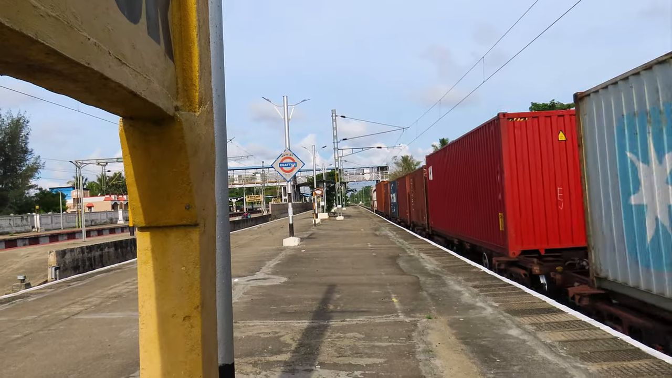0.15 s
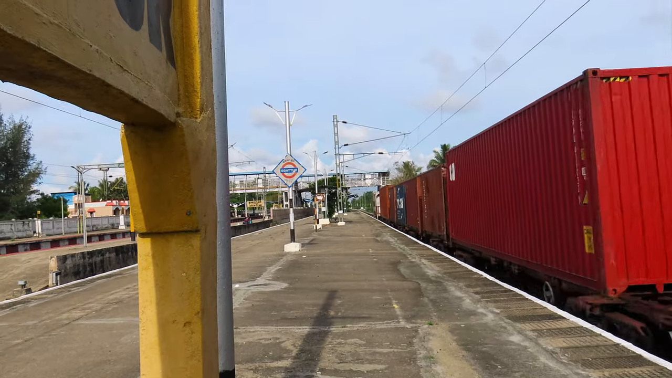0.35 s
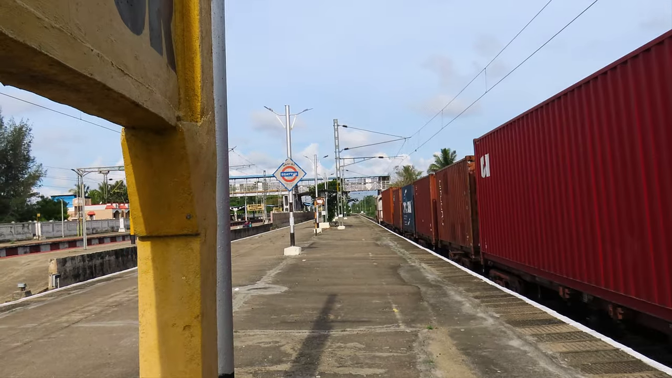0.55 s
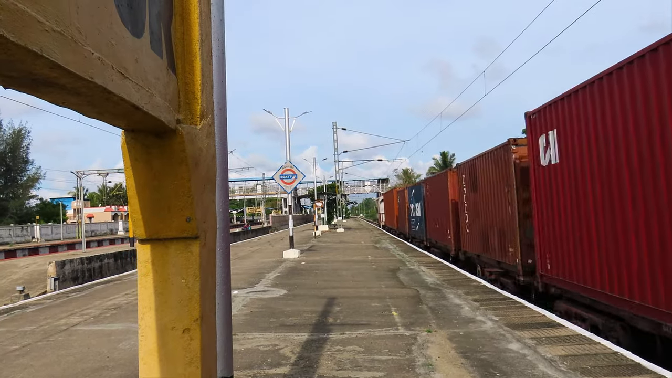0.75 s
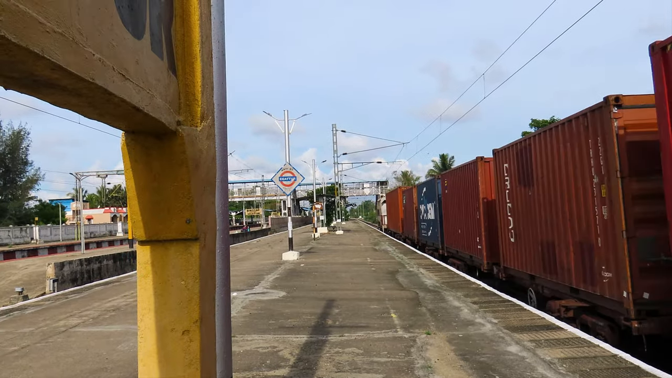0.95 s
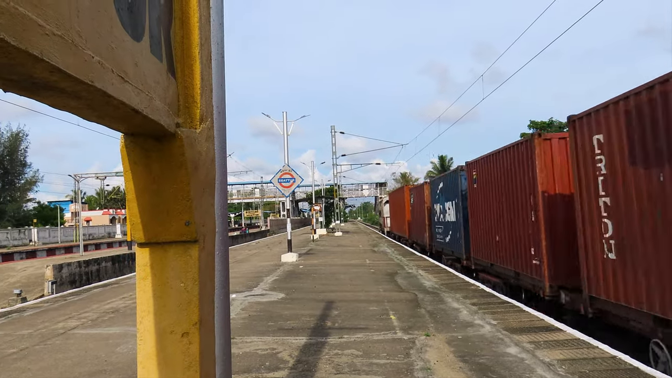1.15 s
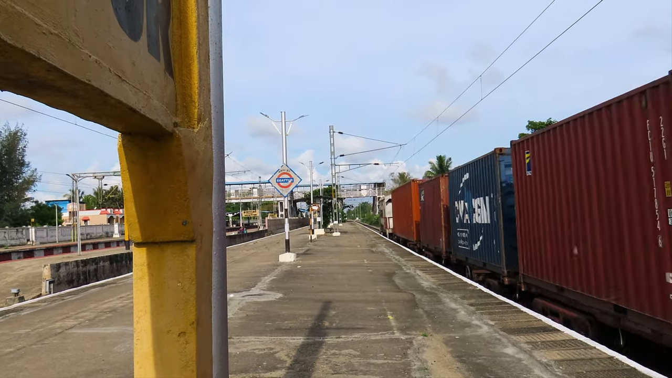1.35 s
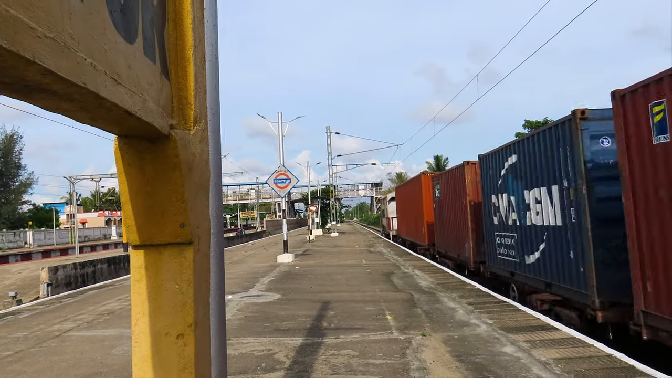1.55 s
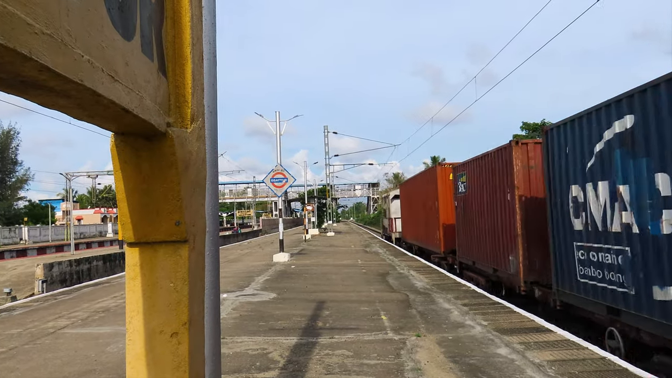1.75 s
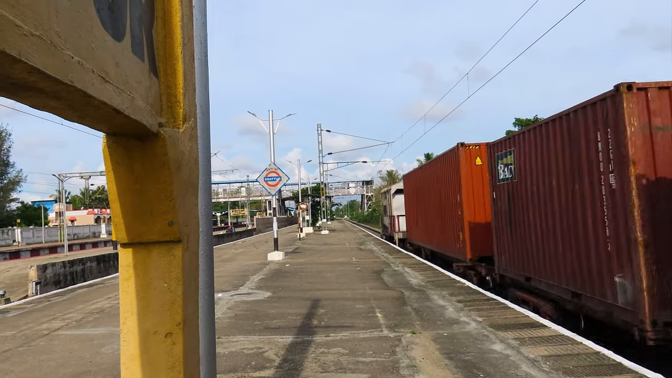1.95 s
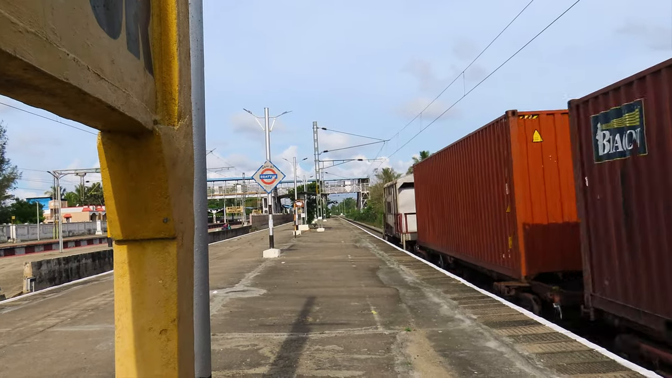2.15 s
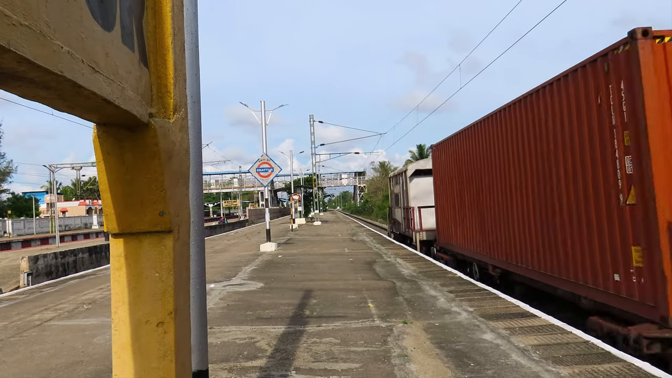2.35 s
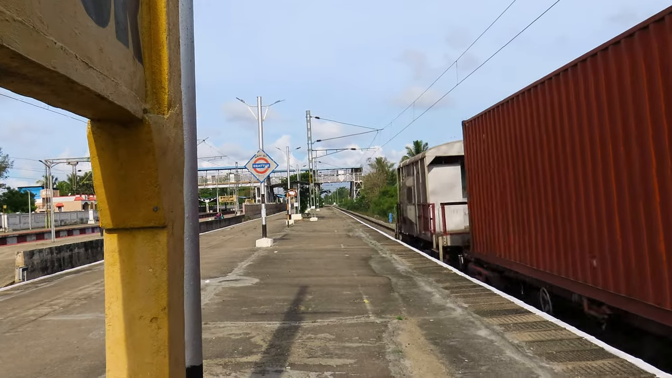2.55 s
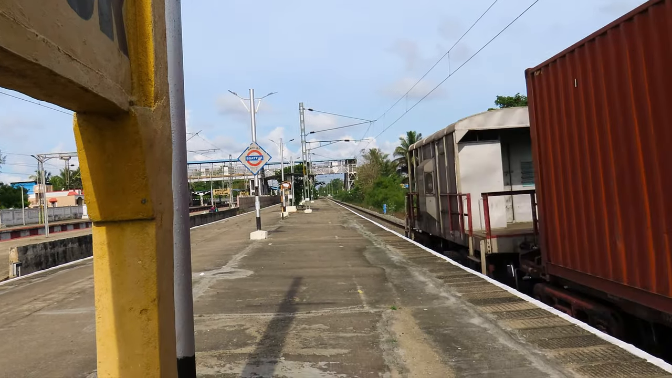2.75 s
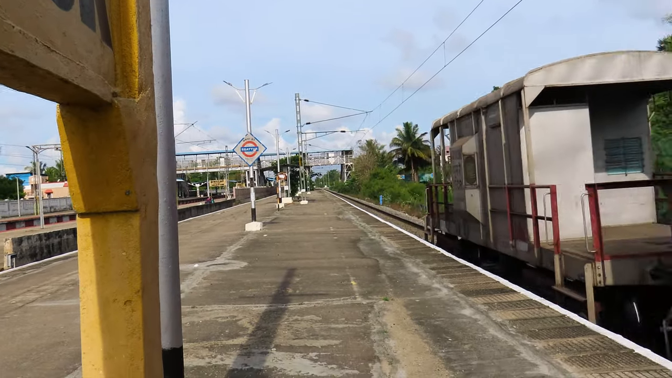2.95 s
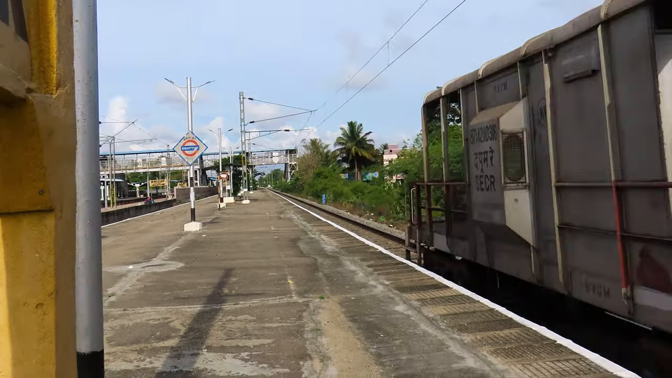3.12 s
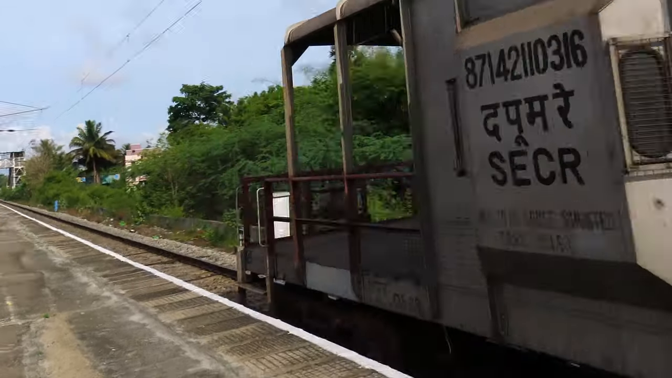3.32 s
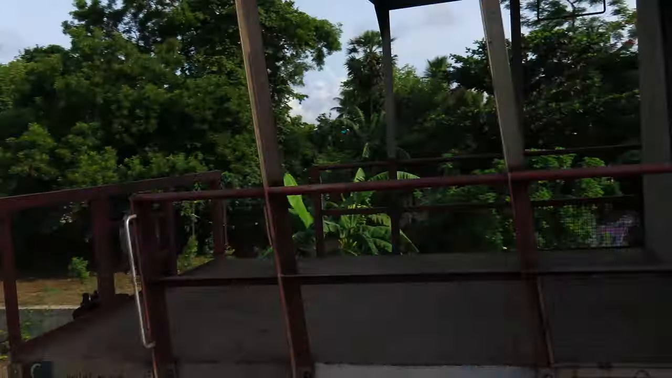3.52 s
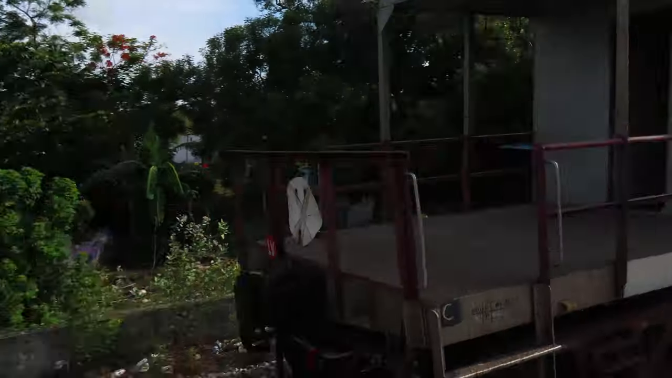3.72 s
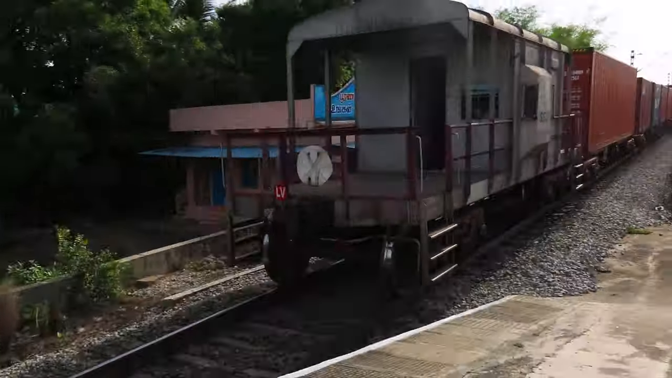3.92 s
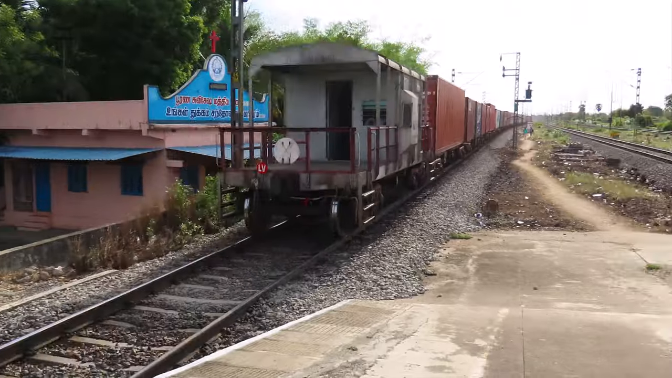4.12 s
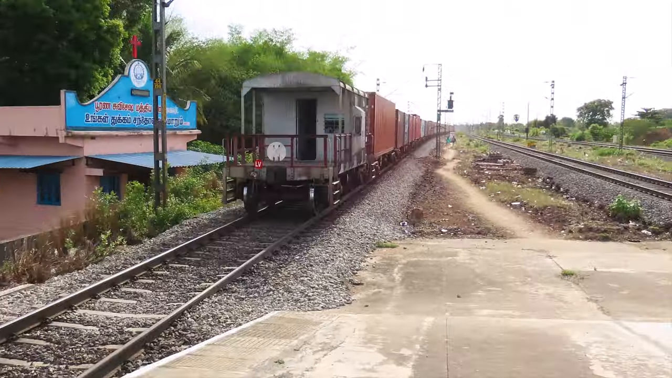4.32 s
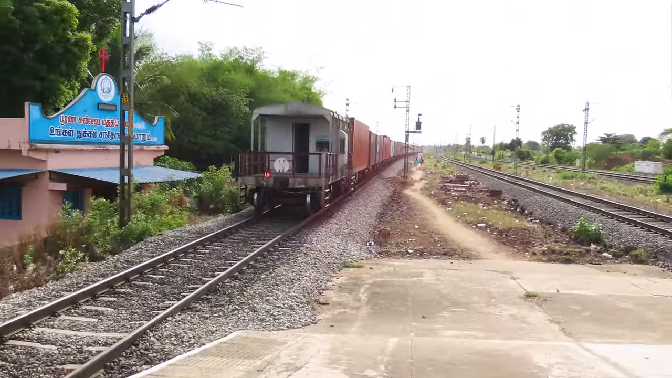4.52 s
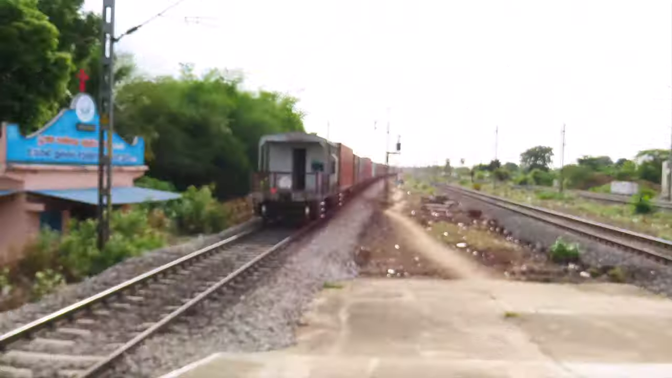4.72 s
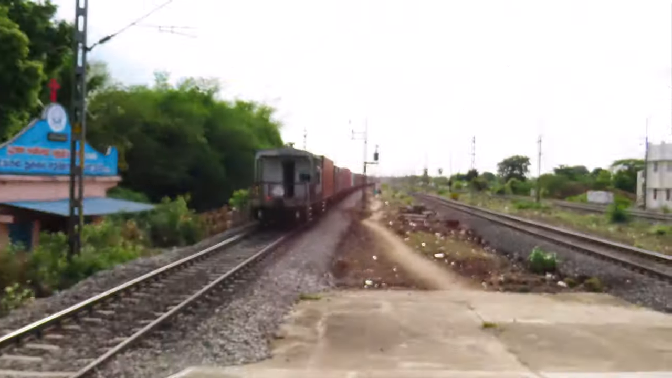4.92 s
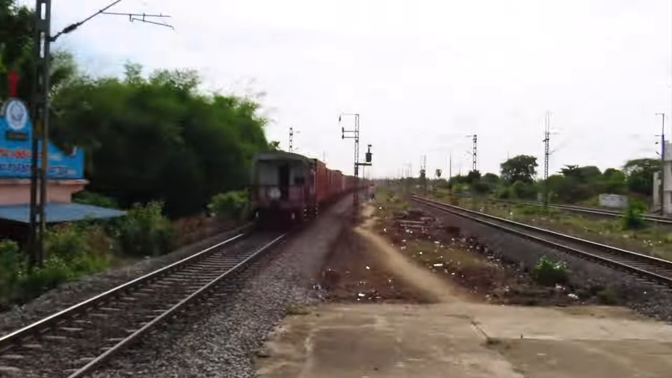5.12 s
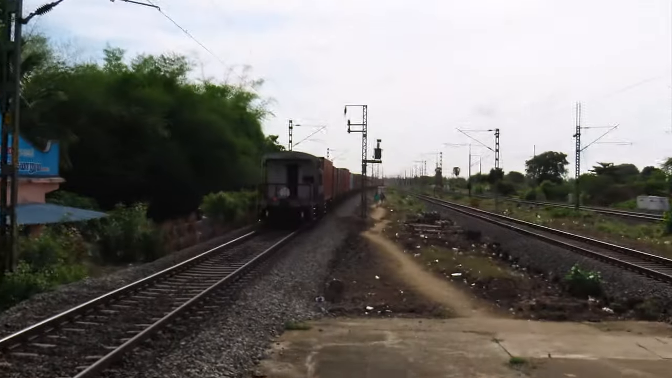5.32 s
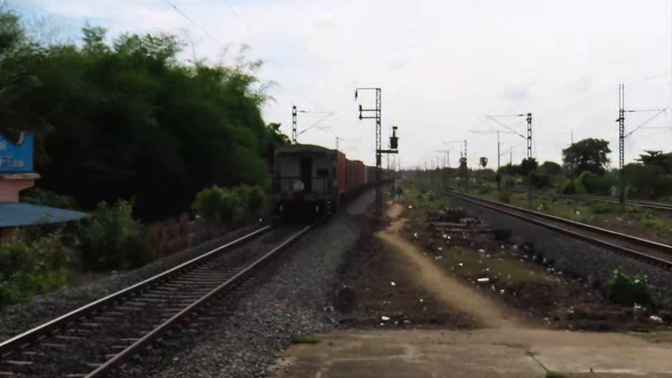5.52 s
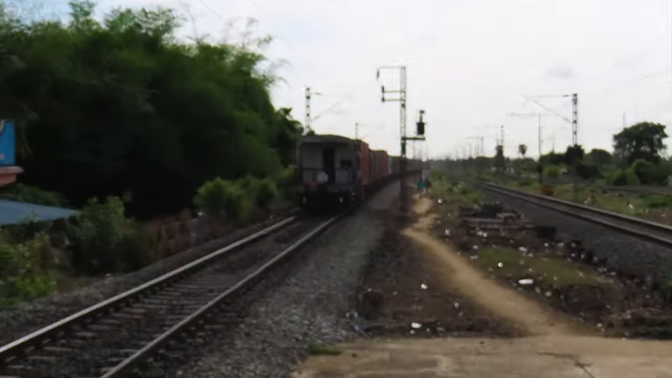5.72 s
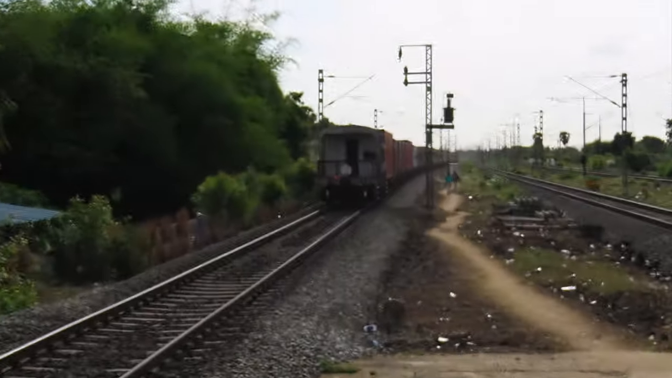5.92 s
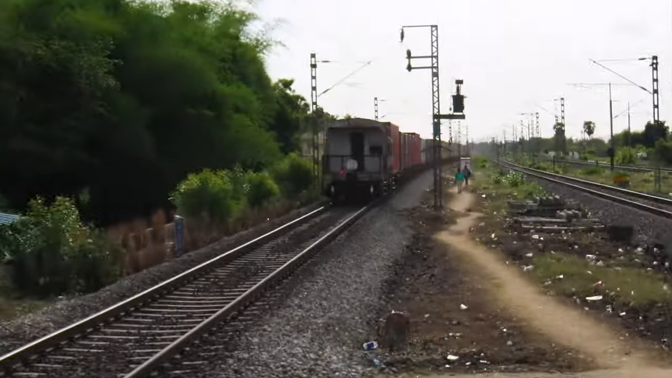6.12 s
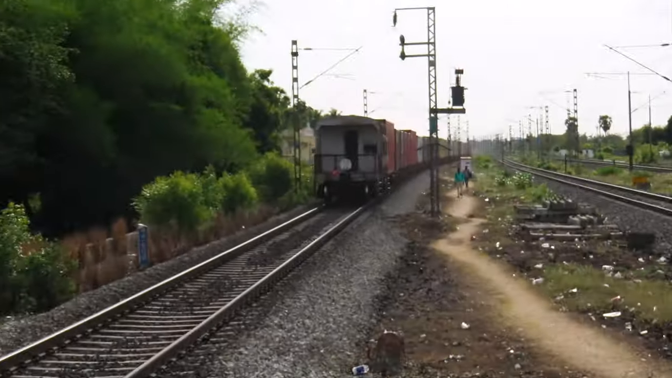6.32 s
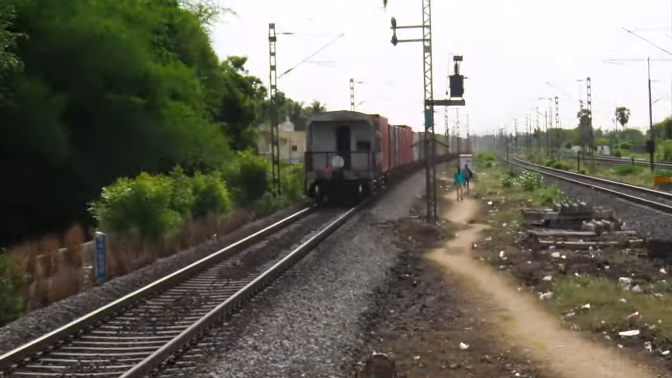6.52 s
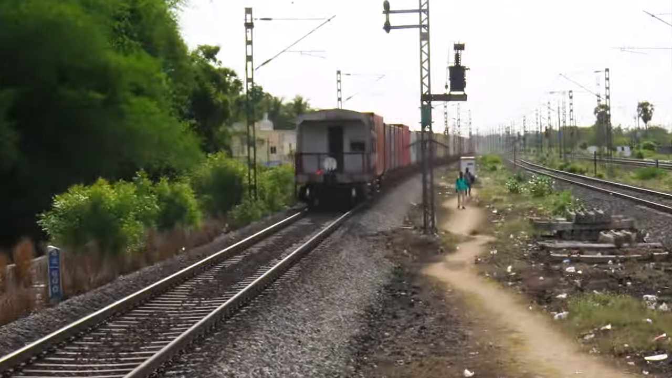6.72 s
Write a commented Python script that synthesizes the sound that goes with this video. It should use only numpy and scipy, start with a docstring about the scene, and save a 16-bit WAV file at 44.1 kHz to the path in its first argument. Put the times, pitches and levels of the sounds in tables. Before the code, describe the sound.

Close beside an open station platform, freight wagon wheels strike a rail joint in quick pairs, grouped in fours, with steely clacks, dull thumps and a roar swelling at each bogie. After three seconds a guard's van clatters past with loose metal knocks and ringing railings. Then the train recedes into a steady, lumpy rumble with soft rail song and thin wavering notes. The stereo microphone stays near the track.

```python
"""A station platform: a container train runs past, its wheels hammering over a rail joint a few metres away.
Every wheel clips the joint, then thumps the sleepers and rattles its bogie; bogies pair up around couplings.
Rolling noise, made of tiny random impacts, swells with each bogie, and a guard's van clatters by.
Then filtered noise makes the rumble and rail song of the departing train, with low swells, thin notes and a ping."""
import sys
import numpy as np
from scipy import signal
from scipy.fft import rfft, irfft, next_fast_len
from scipy.io import wavfile
from scipy.ndimage import uniform_filter1d

SR = 44100
rng = np.random.default_rng(int(sys.argv[2]) if len(sys.argv) > 2 else 0)


def unload_audio(sound):
    """Save the sound as a 16-bit wav file, at the path given as the first command line argument."""
    columns = np.transpose(np.atleast_2d(sound))
    # keep every value between -1 and 1, then stretch to whole-number steps
    steps = np.round(np.clip(columns, -1, 1) * 32767)
    wavfile.write(sys.argv[1], SR, steps.astype(np.int16))


N = 298557
TIME = np.arange(N) / SR
# All levels in dB are relative: a source may shift them when it mixes its parts.

# Every wheel that crosses the joint, two to a bogie.
# Each row: time in seconds, weight of the blow in dB, steely ring in dB, knock pitch in Hz,
# ring pitch in Hz, upper ring pitch in Hz, first touch in dB.
WHEELS = [(0.001, 2, -4.5, 287, 920, 1740, 9.5), (0.073, -1.5, -1.5, 593, 1227, 1880, -4.5),
          (0.218, -4, 4.5, 497, 1140, 1775, -11), (0.306, -0.5, 2.5, 627, 956, 1806, 9),
          (0.679, 3.5, 0.5, 550, 1165, 1744, -0.5), (0.766, -1, 0, 594, 848, 1723, 4.5),
          (0.91, -2, 1, 330, 974, 1754, -3), (0.995, -2.5, 1, 562, 930, 1406, -2),
          (1.331, 1.5, 1.5, 344, 1017, 1450, 8), (1.415, -3.5, 0.5, 617, 1132, 1700, 8.5),
          (1.545, 2.5, 4, 366, 980, 1805, -21), (1.631, 0.5, -1, 605, 882, 1674, -17),
          (1.969, 0, -2.5, 257, 1340, 1577, 4.5), (2.052, -2.5, -1, 533, 1150, 1790, 6),
          (2.180, 1, 4, 342, 1020, 1524, -14), (2.267, -0.5, 1, 600, 940, 1680, -19),
          (2.601, -1.5, -4, 263, 1053, 1530, 1), (2.689, -1, -3.5, 500, 1055, 1610, 2.5),
          (2.83, -3.5, 3, 310, 1000, 1680, -6), (2.917, -2, 2.5, 614, 970, 1840, 5.5),
          (3.290, -3.5, 4, 396, 1112, 1580, 7), (3.379, -1, 0, 676, 904, 1640, 7),
          (3.497, -3, -2.5, 552, 1020, 1760, 1.5), (3.587, -2.5, -1.5, 507, 895, 2070, 6),
          (3.778, -1.5, -7, 264, 827, 1960, -17), (3.873, -8, -7, 420, 950, 1790, -7)]
# The four axles around a coupling, in order.
# Each row: hardness in dB, thud in dB, knock in dB, clang in dB, rattle in dB,
# knock delay in seconds, first touch in dB.
AXLES = [(-1, -21.5, -14.5, -14.5, -41, 0.0063, -7), (-1, -17.5, -10.5, -13.5, -42, 0.0011, -2.5),
         (-0.5, -23, -14, -19, -45.5, 0.0084, -25.5), (1, -19, -9.5, -16.5, -42, 0.0012, -10.5)]
# A wheel touches the joint's first edge just before it drops.
TOUCH_LEAD_S, TOUCH_CLANK_DB, TOUCH_CHINK_DB = 0.02, -8.5, -36


def joint():
    """Wheels cross the gap in a four-beat figure; each has its own weight and pitches."""
    out = np.zeros(N)
    for k, (s, weight_db, ring_db, knock_hz, ring_hz, upper_hz, touch_db) in enumerate(WHEELS):
        hard_db, thud_db, knock_db, clang_db, rattle_db, knock_s, edge_db = AXLES[k % len(AXLES)]
        blow = axle(hard_db, thud_db + weight_db, knock_db + weight_db, clang_db + ring_db,
                    rattle_db + ring_db, knock_s, knock_hz, ring_hz, upper_hz)
        add(out, s, blow)
        touch = clink(TOUCH_CLANK_DB, TOUCH_CHINK_DB) * undb(touch_db + edge_db)
        add(out, s - TOUCH_LEAD_S, touch)
    return out


# The tone of a shaken bogie. Each row: pitch in Hz, level in dB.
BOGIE = [(120, -32.5), (200, -4), (503, 4), (640, -5), (741, -2), (1210, -7), (1400, -10.5), (1750, -11.5),
         (2170, -19.5), (2360, -27.5), (2600, -12.5), (3380, -40.5), (5720, -120)]
# The tone of rattling springs and brake rigging. Each row: pitch in Hz, level in dB.
RATTLE = [(1300, -30), (2100, -1), (2700, 0), (3400, -2), (4400, -17), (5400, -20), (7400, -37),
          (9000, -70), (16000, -100)]
# The two notes each struck wheel rings with, against its clang; the overtone against the first note.
RING_DB, RING_DECAY_S, OVERTONE_DB = -8, 0.011, -7.5


def axle(hard_db, thud_db, knock_db, clang_db, rattle_db, knock_s, knock_hz, ring_hz, upper_hz):
    """A wheel drops onto the next rail: one blow, then the bogie chatters and dies away."""
    t = np.arange(SR // 4) / SR
    rise_s = 0.0025 * undb(-1.2 * hard_db)  # a harder landing shakes the bogie sooner
    fall = np.exp(-t / 0.02) + undb(-13.5) * np.exp(-t / 0.06)
    shaking = (1 - np.exp(-t / rise_s)) * fall
    chatter = grains(len(t), rate=1000, spread_db=-1.5) * shaking
    force = chatter.copy()
    force[0] += undb(14.0 + hard_db)
    body = steel(force, BOGIE)

    # the wheel's weight comes down and it bounces on the springy contact for a few cycles
    landed = np.maximum(t - knock_s, 0)
    bounce = np.sin(2 * np.pi * knock_hz * landed) * np.exp(-landed / 0.0066)
    knock = burst(band(body, "bandpass", [230, 750], order=3), -0.51)
    knock = knock + burst(bounce, hard_db - 5.5)

    # sleepers and ballast give way more slowly
    sleeper_hz = 128 * np.exp(0.18 * rng.standard_normal())
    thud = burst(np.sin(2 * np.pi * sleeper_hz * t) * t * np.exp(-t / 0.0044), 0)
    thud = thud + burst(band(chatter, "bandpass", [60, 250], order=2), -2.1)

    note = np.sin(2 * np.pi * ring_hz * t) + undb(OVERTONE_DB) * np.sin(2 * np.pi * upper_hz * t)
    ringing = note * (1 - np.exp(-t / rise_s)) * np.exp(-t / RING_DECAY_S)
    clang = band(band(body, "highpass", 786, order=3), "lowpass", 1923, order=8)
    clang = burst(clang, 0) + burst(ringing, RING_DB)

    # springs and brake rigging: every blow draws its own five notes
    rigging = sum(ring(force, hz, 30) for hz in rng.uniform(2000, 4000, size=5))
    rattle = unit(colour(force, RATTLE)) + undb(-4.5) * unit(colour(rigging, RATTLE))
    return (burst(thud, thud_db - 3.5) + burst(knock, knock_db - 5.0)
            + burst(clang, clang_db - 5.0) + burst(rattle, rattle_db + 3.5))


# The wheel's own notes. Each row: pitch in Hz before a small random detune, width in Hz, level in dB.
WHEEL_MODES = [(340, 110, 4.5), (530, 93, 17), (585, 50, -9), (840, 4.6, -11.5), (1050, 94, -7.5),
               (1141, 41, 9), (1620, 28, -8), (1840, 10, -19), (2640, 19, -12.5), (2900, 11, -13.5),
               (3730, 19, -32.5)]


def steel(force, spectrum):
    """A dense mass of steel resonances with the wheel's own modes standing out."""
    detune = 1 + 0.048 * rng.standard_normal(len(WHEEL_MODES))
    wheel = sum(undb(db) * ring(force, hz * d, width) for (hz, width, db), d in zip(WHEEL_MODES, detune))
    return unit(colour(force, spectrum)) + undb(-5.5) * unit(wheel)


# The bright tone of small steel parts. Each row: pitch in Hz, level in dB.
CHINK = [(1200, -29), (2400, 0), (3500, -6.5), (4300, -9), (5300, -3), (7400, -35.5), (9600, -68.5),
         (16000, -95)]
CHINK_RING_HZ, CHINK_RING_WIDTH_HZ = 3700, 290  # the note that small steel parts ring with


def clink(clank_db, chink_db):
    """A light steel-on-steel contact: a short clank with a bright, ringing chink."""
    t = np.arange(SR // 8) / SR
    force = grains(len(t), rate=3600, spread_db=-5.0)
    clank = band(steel(force * np.exp(-t / .005), BOGIE), "bandpass", [400, 2000], order=4)
    chink = colour(force * np.exp(-t / .004), CHINK)
    chink = chink + undb(5.5) * ring(chink, CHINK_RING_HZ, CHINK_RING_WIDTH_HZ)
    return burst(clank, clank_db - 20.0) + burst(chink, chink_db - 5.0)


# Loose couplings and brake gear. Each row: time in seconds, clank in dB, chink in dB.
FITTINGS = [(3.3062, -10.5, -33), (3.8437, -5, -37), (3.861, -9.5, -32)]


def fittings():
    """Loose steel parts clank and chink as the last bogies shake."""
    out = np.zeros(N)
    for s, clank_db, chink_db in FITTINGS:
        add(out, s, clink(clank_db, chink_db))
    return out


# The rolling noise as rumble, roar, clatter and hiss, in that order.
# Each row: level between bogies in dB, rise beside a bogie in dB.
WAGONS = [(-30.5, 0.9), (-30, 4.5), (-40, 4.5), (-59.5, 6)]
# The tone of the rolling noise. Each row: pitch in Hz, level in dB.
ROLLING = [(15, -43.5), (25, -11), (65, -4.5), (176, -6), (240, -3), (277, -7.5), (312, -5.5), (405, -9),
           (479, -3.5), (607, -12.5), (1270, -10.5), (1900, -33.5), (2150, -37.5), (2600, -37),
           (7400, -36.5), (9620, -65), (16300, -120)]


def wagons():
    """Rough wheels on rough rail: wagon bodies rumble, bogies roar and clatter, the contact hisses."""
    near = nearness()
    rumble_db, roar_db, clatter_db, hiss_db = (between_db + rise_db * near for between_db, rise_db in WAGONS)
    roll = colour(grains(N, rate=4000, spread_db=-1), ROLLING)
    jolt = walk(30.46)  # shared by roar, clatter and hiss
    rumble = unit(band(roll, "lowpass", 274.0, order=5)) * undb(rumble_db + 2.5 + 1.0 * walk(12))
    roar = unit(band(roll, "bandpass", [270, 1700], order=5)) * undb(roar_db + 1.4 * jolt)
    clatter = unit(band(roll, "bandpass", [1700, 4000], order=5)) * undb(clatter_db - 3.5 + 2.0 * jolt)
    hiss = unit(band(roll, "highpass", 4550, order=7)) * undb(hiss_db + 11.5 + 1.2 * jolt)
    return rumble + roar + clatter + hiss


BOGIE_SWELL_S, BOGIE_LAG_S = 0.083, 0.012  # half-width of the swell, and its delay after the joint


def nearness():
    """About 1 while a bogie is alongside, near 0 at mid-wagon."""
    middles = np.array(WHEELS)[:, 0].reshape(-1, 2).mean(axis=1)
    return sum(np.exp(-((TIME - s - BOGIE_LAG_S) / BOGIE_SWELL_S) ** 2) for s in middles)


# Low swells in the rumble.
# Each row: middle in seconds, length in seconds, pitch in Hz, level in dB.
RUMBLE_SWELLS = [(0.59, 0.21, 187, -23.5), (0.64, 0.27, 87, -26), (1.01, 0.112, 110, -25.5),
                 (1.23, 0.23, 73.4, -28.5), (2.93, 0.18, 107.4, -27.5), (3.28, 0.2, 202, -21),
                 (3.85, 0.19, 99, -25), (4.08, 0.11, 259, -34), (4.71, 0.1, 197, -30.5),
                 (4.82, 0.11, 172, -26.5), (5.07, 0.11, 148, -26), (5.25, 0.11, 199, -29),
                 (5.99, 0.098, 205, -31), (6.17, 0.12, 192, -24.5), (6.28, 0.27, 200, -25),
                 (6.3, 0.18, 71.7, -29)]
SWELL_WIDTH = 0.42  # bandwidth of each of two passes, as a share of the pitch


def rumble_swells():
    """Low swells of narrow-band noise make the rumble lumpy."""
    out = np.zeros(N)
    for s, length_s, hz, db in RUMBLE_SWELLS:
        width = hz * SWELL_WIDTH
        boom = ring(ring(rng.standard_normal(SR // 2), hz, width), hz, width)
        add(out, s - length_s / 2, swell(boom, length_s, db - 5.5))
    return out


# The tone of the van's body. Each row: pitch in Hz, level in dB.
VAN_BODY = [(150, -19), (330, 5), (700, -4), (950, 2.5), (1300, 1), (1900, -0.5), (2600, -13), (3300, -23),
            (3900, -18.5), (4500, -29.5), (8000, -55), (16000, -100)]
VAN_ARRIVES_S, VAN_LEAVES_S = 3.166, 3.62
VAN_DB, VAN_RISE_DB_PER_S, VAN_FALL_DB_PER_S = -34.5, 56.5, 20
TRAIL_DB, TRAIL_FALL_DB_PER_S = -45.5, 14.5  # hiss of the last wheels as they draw away


def van():
    """Random jolts shake the light guard's van; its clatter and the slower-fading wheel hiss draw away."""
    gone_s = np.maximum(TIME - VAN_LEAVES_S, 0)
    approach_db = -VAN_RISE_DB_PER_S * np.maximum(VAN_ARRIVES_S - TIME, 0)
    shaking = grains(N, rate=260, spread_db=2.5)
    clatter = unit(steel(shaking, VAN_BODY)) + undb(-6.5) * panels(shaking)
    # the railings never stop ringing while the van is shaken
    railings = band(panels(grains(N, rate=620, spread_db=7.0)), "bandpass", [1450, 2750], order=5)
    clatter = clatter + undb(-4.0) * unit(railings)
    hiss = unit(band(grains(N, rate=990, spread_db=-4.5), "bandpass", [1650, 2900], order=3))
    hiss = hiss * undb(2.5 * walk(12))
    clatter = clatter * undb(VAN_DB - VAN_FALL_DB_PER_S * gone_s)
    hiss = hiss * undb(TRAIL_DB - TRAIL_FALL_DB_PER_S * gone_s)
    return undb(approach_db) * (clatter + hiss)


# The van's loose body panels and railings.
# Each row: pitch in Hz before a small random detune, width in Hz, level in dB.
VAN_PANELS = [(292.4, 16, 0.5), (351, 14, -3.5), (417.7, 8.9, -4), (522, 17, -5.5), (745, 44, -6),
              (872, 26, -10.5), (1476, 22, -9.5), (1715, 26, -4.5), (1900, 19, -10.5), (2120, 19, -14.5),
              (2260, 14, -13), (2536, 12, -16.5), (2770, 6.6, -22), (3710, 40, -24.5)]


def panels(force):
    """The van's panels and railings ring, a little differently each time they are shaken."""
    detune = 1 + 0.01 * rng.standard_normal(len(VAN_PANELS))
    return sum(undb(db) * unit(ring(force, hz * d, width)) for (hz, width, db), d in zip(VAN_PANELS, detune))


# Knocks of loose steel on the last vehicles.
# Each row: time in seconds, low boom in dB, higher ring in dB.
STEEL_KNOCKS = [(3.292, -26.5, -46), (3.304, -42, -30.5), (3.405, -27, -38.5), (3.479, -25, -42),
                (3.502, -32, -36), (3.535, -21.5, -40), (3.563, -33, -29.5), (3.587, -37, -27.5),
                (3.603, -21, -33.5), (3.701, -32, -48), (3.761, -26, -40), (3.782, -20, -29),
                (3.845, -23, -27.5), (3.883, -24, -34.5)]
SPLIT_HZ, RING_TOP_HZ = 1000, 3700  # the boom lies below the split, the ring from there to the top


def steel_knocks():
    """Knocks of loose steel on the last vehicles: a low boom and a higher ring."""
    out, t = np.zeros(N), np.arange(SR // 3) / SR
    for s, boom_db, ring_db in STEEL_KNOCKS:
        force = grains(len(t), rate=3700, spread_db=1.5) * np.exp(-t / 0.0099)
        force[0] += undb(14.5)
        struck = panels(force)
        boom = band(struck, "lowpass", SPLIT_HZ)
        ringing = band(struck, "bandpass", [SPLIT_HZ, RING_TOP_HZ])
        add(out, s, burst(boom, boom_db) + burst(ringing, ring_db))
    return out


# Dry ticks. Each row: time in seconds, level in dB.
TICKS = [(1.3315, -31), (3.2054, -24.5), (4.729, -30.5)]
# The tone of a tick. Each row: pitch in Hz, level in dB.
TICK = [(300, -3), (1000, 7), (1500, 11), (2100, -13), (3800, -10), (4700, -20), (7000, -30.5),
        (10000, -41), (15000, -38)]


def ticks():
    """A few sharp, dry ticks close to the microphone, each a very short burst of noise."""
    out, t = np.zeros(N), np.arange(SR // 20) / SR
    for s, db in TICKS:
        snap = rng.standard_normal(len(t)) * np.exp(-t / 0.0029)
        add(out, s, burst(colour(snap, TICK), db - 5))
    return out


# Thin notes: squeals, ringing railings and rail song.
# Each row: middle in seconds, length in seconds, pitch in Hz, waver in Hz, level in dB.
THIN_NOTES = [(3.905, 0.081, 6212, 9.2, -52), (3.955, 0.21, 3040, 30, -53), (4.03, 0.22, 1715, 23, -45.5),
              (4.192, 0.3, 1706, 22, -41.5), (4.344, 0.16, 1650, 25, -47), (4.527, 0.39, 1690, 45, -48),
              (4.738, 0.21, 1690, 32, -46), (5.386, 0.17, 1052, 62, -37), (5.601, 0.12, 1697, 17, -44),
              (5.881, 0.19, 1101, 43, -37.5), (6.394, 0.24, 1085, 50, -36.5),
              (6.487, 0.18, 1706, 12, -43.5), (6.676, 0.14, 1770, 8.3, -44)]


def thin_notes():
    """Thin, wavering notes fade in and out: squeals, ringing railings and rail song."""
    out, waver, flutter = np.zeros(N), walk(220), undb(2 * walk(60))
    for s, length_s, hz, waver_hz, db in THIN_NOTES:
        span = (int(s * SR) + np.arange(SR)) % N
        phase = 2 * np.pi * np.cumsum(hz + waver_hz * waver[span]) / SR
        note = np.sin(phase) * flutter[span]
        add(out, s - length_s / 2, swell(note, length_s, db))
    return out


# A loose part on the departing train pings. Each row: time in seconds, pitch in Hz, level in dB.
PINGS = [(4.973, 2735, -45.5)]
PING_ATTACK_S, PING_DECAY_S = 0.004, 0.03


def pings():
    """A quick, thin ring with equally strong rubbing noise at the same pitch."""
    out, t = np.zeros(N), np.arange(SR // 5) / SR
    for s, hz, db in PINGS:
        rub = grains(len(t), rate=3700, spread_db=-2) * np.exp(-t / 0.022)
        rub = ring(ring(rub, hz, 260), hz, 260)
        note = np.sin(2 * np.pi * hz * t) * (1 - np.exp(-t / PING_ATTACK_S)) * np.exp(-t / PING_DECAY_S)
        add(out, s, burst(note, db) + burst(rub, db))
    return out


# The train heard from behind. Each row: time in seconds, rumble in dB, rail song in dB.
DEPARTING = [(4.05, -33, -35), (4.25, -37, -36.5), (4.52, -38.5, -34.5), (4.9, -38, -36),
             (5.35, -35.5, -33), (5.8, -34.5, -32.5), (6.0, -32, -32), (6.25, -35, -30),
             (6.7, -35.5, -30.5)]
# The tone of the distant train. Each row: pitch in Hz, level in dB.
DISTANT = [(15, -20.5), (25, -10), (70, 0), (115, -7), (208, 1), (258, -3.5), (405, -7), (637, -22),
           (1080, -16.5), (1500, -25.5), (1690, -23.5), (2530, -34), (3980, -42.5), (5060, -53),
           (7400, -47), (9620, -74), (16300, -120)]
# Steady ringing over the distant rumble.
# Each row: pitch in Hz, width in Hz of each of two passes, level in dB.
RAIL_TONES = [(198, 59, -43.5), (1077, 290, -42.5), (1697, 110, -52), (2840, 20, -67), (4550, 100, -69.5)]
WHISTLE_HZ = 3876
GROUND_DB, GROUND_FOLLOW = -35, 0.94  # ground rumble: its level, and dB of change per dB of rail song


def departing():
    """Distant wheels blend into a lumpy rumble of filtered noise, and the rails ring with them."""
    rumble_db, song_db = curves(DEPARTING)
    song_change_db = song_db - song_db.mean()
    ground_db = GROUND_DB + GROUND_FOLLOW * song_change_db
    roll = colour(rng.standard_normal(N), DISTANT)
    ground = unit(band(roll, "lowpass", 126.5, order=5)) * undb(ground_db + 0.64 * walk(8.2))
    rumble = unit(band(roll, "bandpass", [115, 620], order=4)) * undb(rumble_db + 6.0 + 0.6 * walk(14))
    song = unit(band(roll, "highpass", 670, order=5)) * undb(song_db + .5 * walk(22))
    tones = np.zeros(N)
    for hz, width, db in RAIL_TONES:
        tones += undb(db) * unit(ring(ring(rng.standard_normal(N), hz, width), hz, width))
    whistle = np.sin(2 * np.pi * WHISTLE_HZ * TIME) * undb(-63.5 + 0.88 * walk(5.7))
    return ground + rumble + song + (tones + whistle) * undb(1.6 * song_change_db)


def soften(x):
    """A low-pass softens the treble."""
    return band(x, "lowpass", 4087, order=4)


# Difference between the microphone's two ports.
# Each row: pitch in Hz, side minus mid in dB, phase in radians.
PORTS = [(60, -48, 0.1), (250, -55.5, 0.2), (520, -15, 0.1), (850, -26, 0.3), (1500, -6, 0.3),
         (2500, -4, 0.7), (4200, 0, 1.4), (5300, 8.5, 1.3), (7300, 21.5, 1.4), (9600, 42, 1.57),
         (13000, 15.5, 1.57)]
# Sound that arrives from all around. Each row: pitch in Hz, side minus mid in dB.
DIFFUSE = [(60, -55), (300, -41), (900, -40), (1500, -49.5), (2600, -11.5), (4300, -10), (7400, 11)]


def stereo(x, aside_db, around_db):
    """Close ports hear the same bass; higher up they differ, until the top is in opposite polarity."""
    size = 2 * next_fast_len(N // 2 + SR // 10)
    hz = np.fft.rfftfreq(size, 1 / SR)
    edge = np.minimum(1, np.minimum(TIME, TIME[::-1]) / .003)  # 3 ms fades at both ends
    x = soften(x) * np.sin(np.pi / 2 * edge) ** 2
    direct_db = read(PORTS, hz) + aside_db / (1 + (hz / 5500) ** 4)
    direct = undb(direct_db) * np.exp(1j * read(PORTS, hz, axis=2))
    # scattered echoes from platform and wagon sides
    t = np.arange(SR // 10) / SR
    echoes = rng.standard_normal(len(t)) * np.exp(-t / .025)
    around = undb(read(DIFFUSE, hz) + around_db) * rfft(echoes / np.linalg.norm(echoes), size)
    side = irfft(rfft(x, size) * (direct + around))[:N]
    return np.array([x + side, x - side])


def undb(db):
    """Decibels to gain."""
    return 10 ** (np.asarray(db) / 20)


def unit(x):
    """Scale to rms (average strength) 1."""
    return x / np.sqrt(np.mean(x ** 2) + 1e-20)


def burst(x, db):
    """Set the rms level of a blow's first 30 ms."""
    return undb(db) * x / np.sqrt(np.mean(x[:int(.03 * SR)] ** 2) + 1e-20)


def swell(x, length_s, db):
    """Fade a sound in and out over length_s and set its rms level."""
    size = int(np.clip(length_s * SR, SR // 100, len(x)))
    return undb(db) * unit(x[:size] * np.hanning(size))


def add(track, s, sound):
    """Mix a sound in at time s."""
    start = max(int(s * SR), 0)
    track[start:start + len(sound)] += sound[:N - start]


def grains(size, rate, spread_db):
    """Tiny steel-on-steel impacts of uneven strength, about rate of them a second."""
    hits = rng.random(size) < rate / SR
    signs = rng.choice([-1, 1], size)
    return unit(hits * signs * undb(spread_db * rng.standard_normal(size)))


def walk(rate):
    """A slow random wander around 0 with rms 1."""
    k = int(SR / rate)
    steps = np.repeat(rng.standard_normal(N // k + 1), k)
    return unit(uniform_filter1d(uniform_filter1d(steps, k), k)[:N])


def curves(table):
    """The columns of a timed table, sample by sample."""
    s, *columns = np.transpose(table)
    return [np.interp(TIME, s, c) for c in columns]


def read(table, hz, axis=1):
    """A column of a spectrum table on a log-frequency axis."""
    rows = np.array(table)
    return np.interp(np.log(hz + 1), np.log(rows[:, 0]), rows[:, axis])


def colour(x, spectrum):
    """Filter a sound to the given spectrum, with no sound before its cause (minimum phase)."""
    size = 2 * next_fast_len(len(x) // 2 + 2048)
    cepstrum = irfft(np.log(undb(read(spectrum, np.fft.rfftfreq(size, 1 / SR)))))
    cepstrum[1:size // 2] *= 2
    cepstrum[size // 2 + 1:] = 0
    return irfft(rfft(x, size) * np.exp(rfft(cepstrum)))[:len(x)]


def band(x, kind, hz, order=3):
    """Low-, high- or band-pass."""
    return signal.sosfilt(signal.butter(order, hz, kind, fs=SR, output="sos"), x)


def ring(x, hz, width):
    """One resonance, gain 1 at its centre."""
    return signal.lfilter(*signal.iirpeak(hz, hz / width, fs=SR), x)


HANDOVER_S = 3.73  # middle of the crossfade from near rolling noise to departing train


def scene():
    """The near wagons pass to one side; the departing train lies more nearly straight ahead."""
    gone = np.clip(.5 + (TIME - HANDOVER_S) / 0.81, 0, 1)
    near = joint() + fittings() + wagons() * np.cos(gone * np.pi / 2)
    far = departing() * np.sin(gone * np.pi / 2) + van() + steel_knocks() + thin_notes() + pings()
    near_stereo = stereo(near + rumble_swells(), aside_db=-6.0, around_db=-17.5)
    far_stereo = stereo(far, aside_db=-21.0, around_db=-4.5)
    return near_stereo + far_stereo + ticks()


TOP_HZ = 15800


def record(dry):
    """A steep low-pass cuts the top."""
    return signal.sosfilt(signal.ellip(8, .2, 70, TOP_HZ, fs=SR, output="sos"), dry)


dry = scene()
out = record(dry)
unload_audio(out)
```